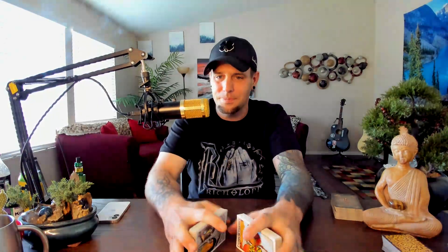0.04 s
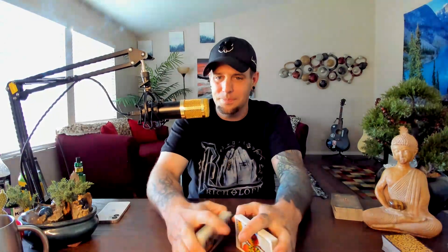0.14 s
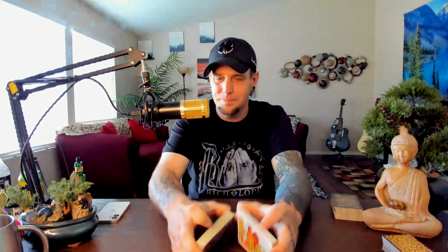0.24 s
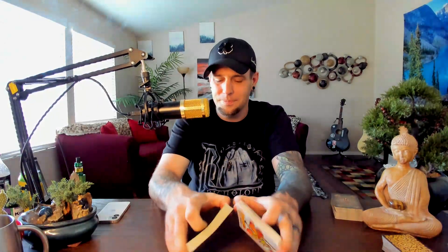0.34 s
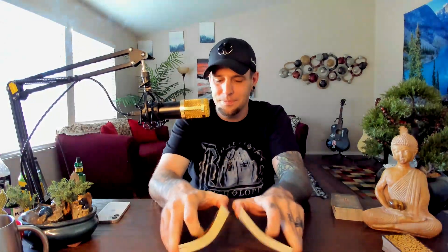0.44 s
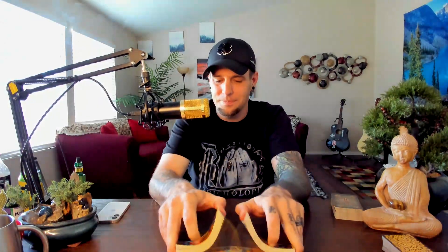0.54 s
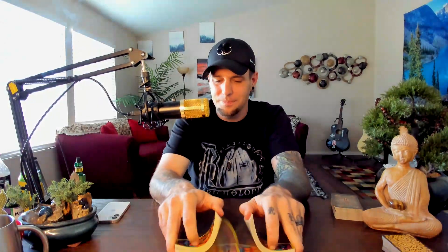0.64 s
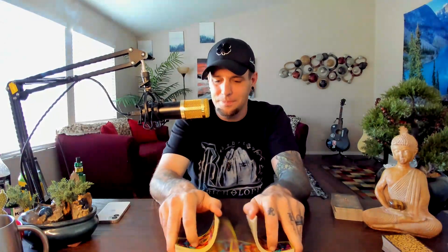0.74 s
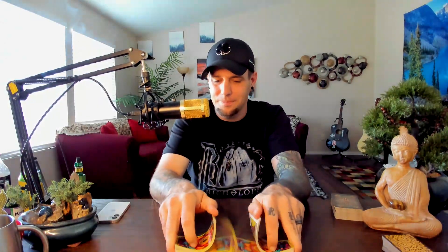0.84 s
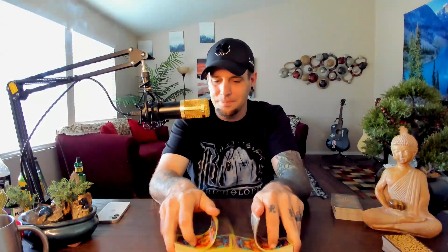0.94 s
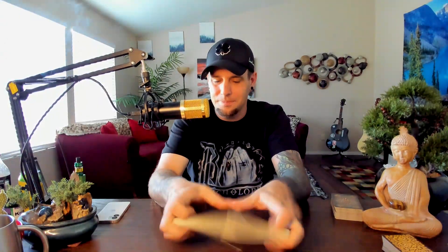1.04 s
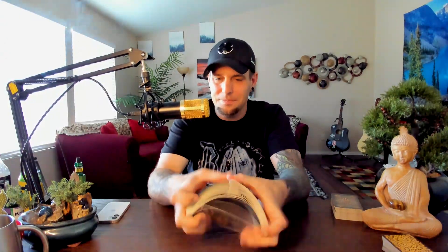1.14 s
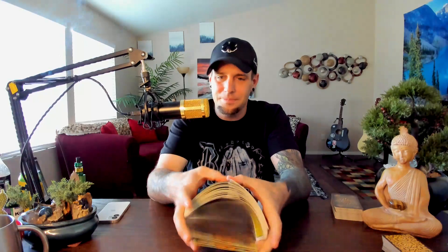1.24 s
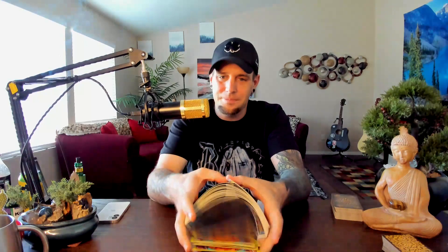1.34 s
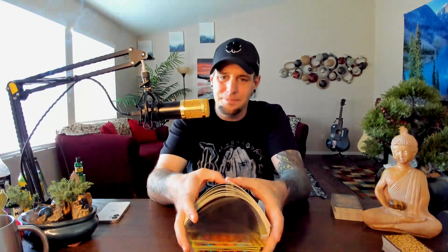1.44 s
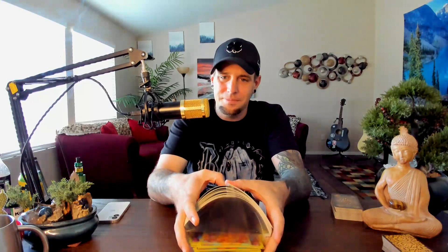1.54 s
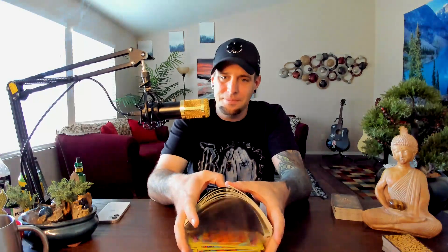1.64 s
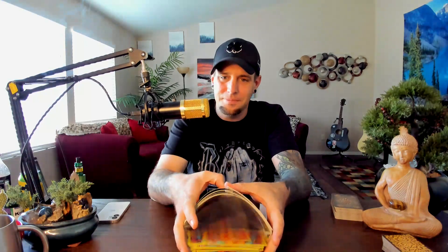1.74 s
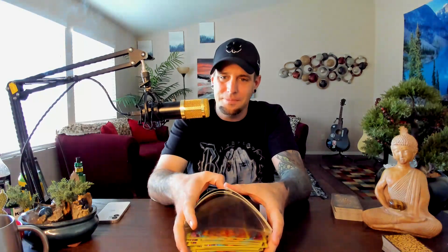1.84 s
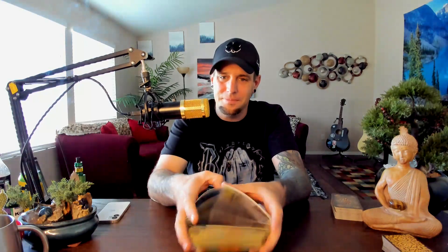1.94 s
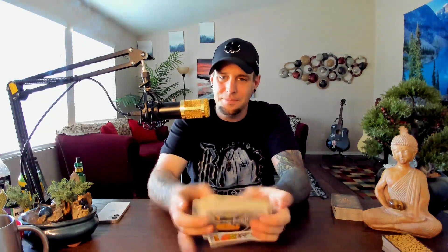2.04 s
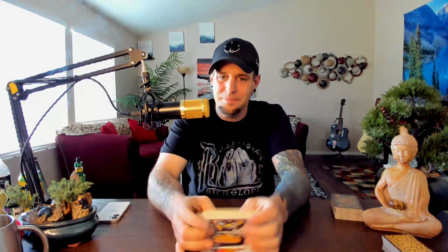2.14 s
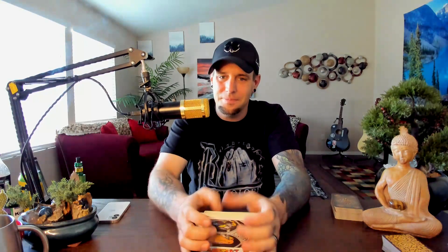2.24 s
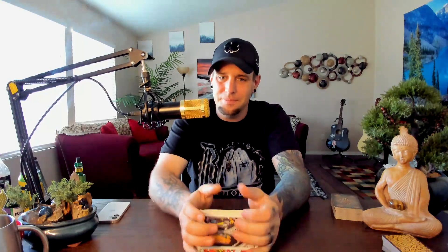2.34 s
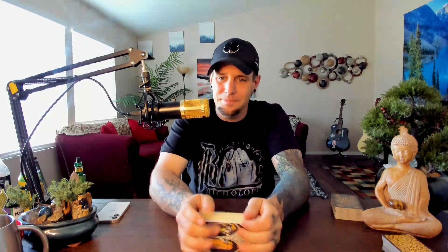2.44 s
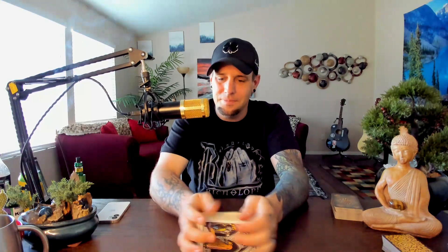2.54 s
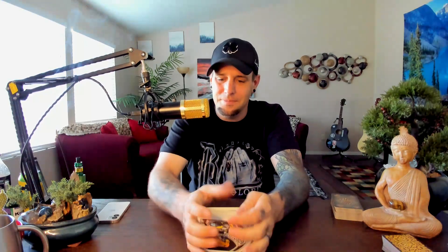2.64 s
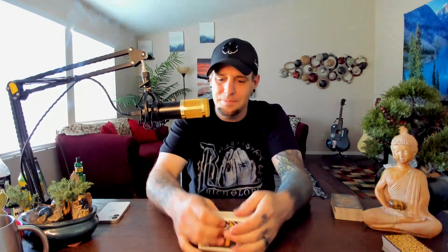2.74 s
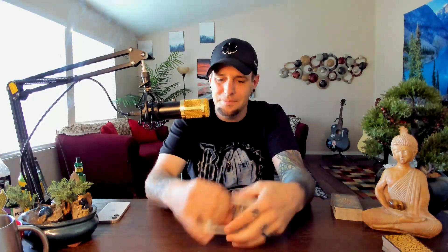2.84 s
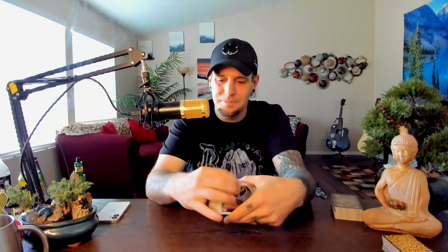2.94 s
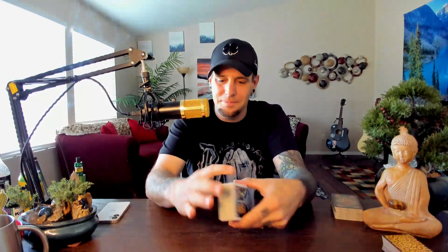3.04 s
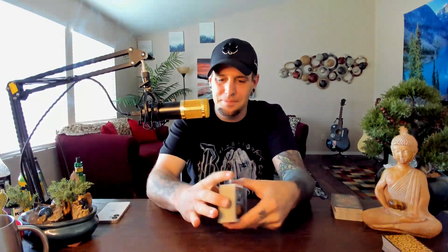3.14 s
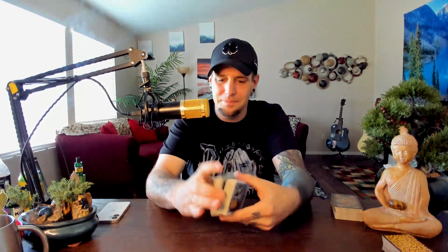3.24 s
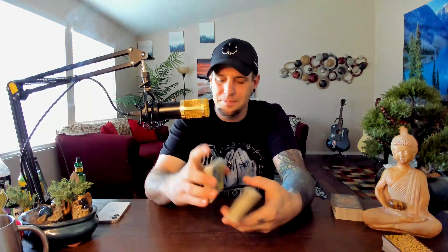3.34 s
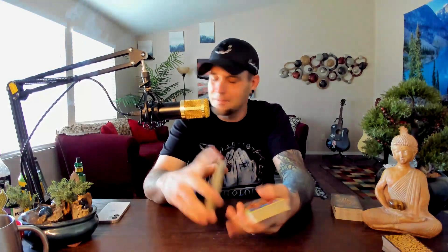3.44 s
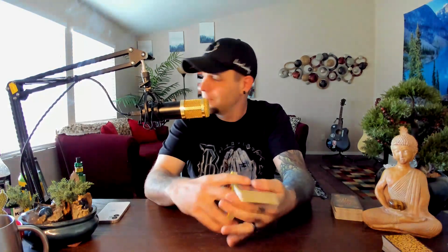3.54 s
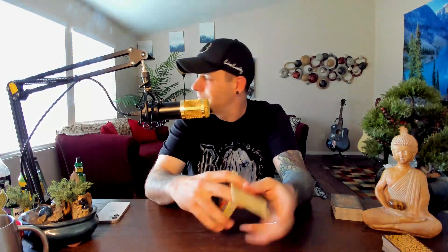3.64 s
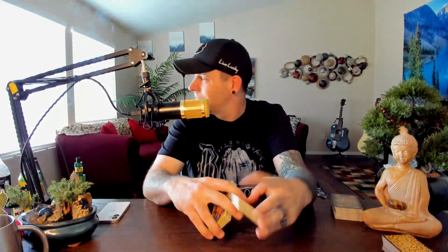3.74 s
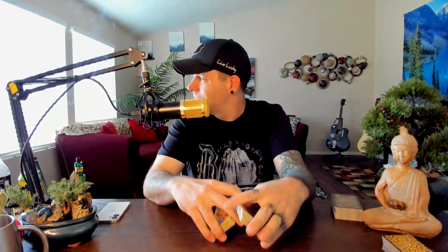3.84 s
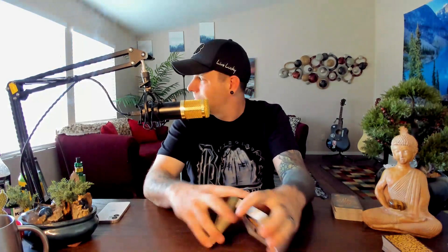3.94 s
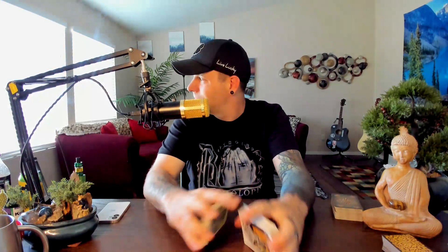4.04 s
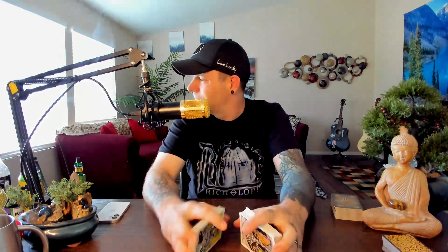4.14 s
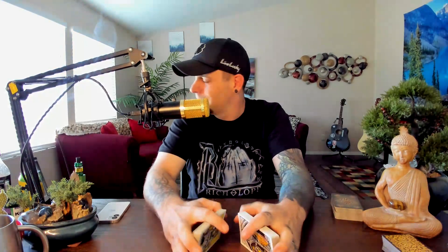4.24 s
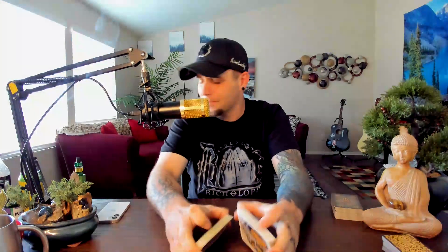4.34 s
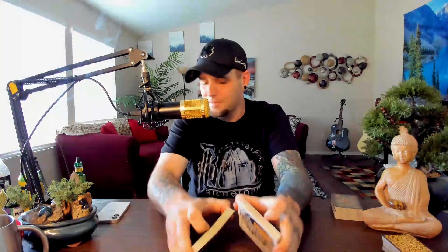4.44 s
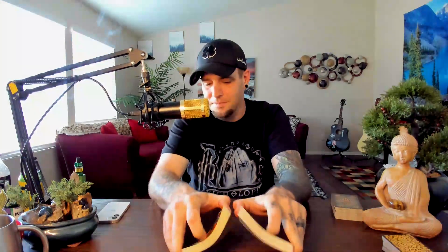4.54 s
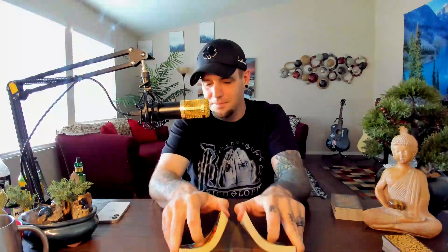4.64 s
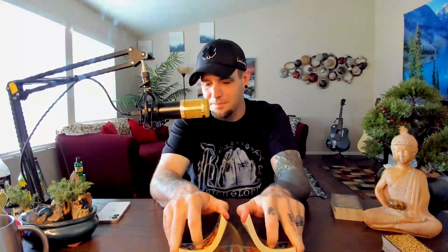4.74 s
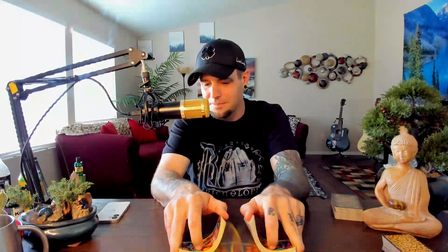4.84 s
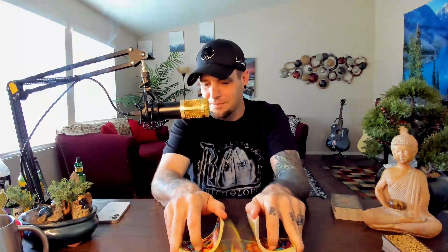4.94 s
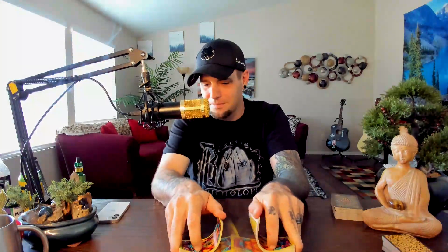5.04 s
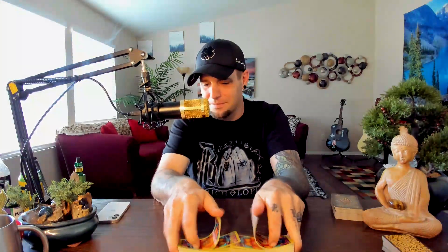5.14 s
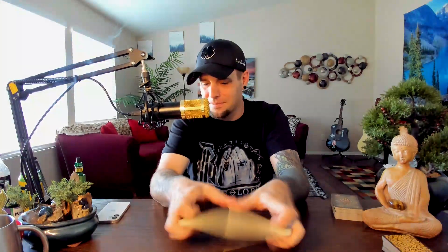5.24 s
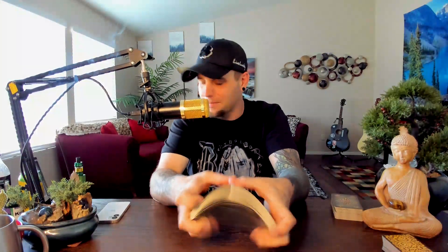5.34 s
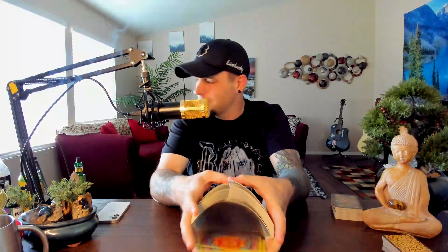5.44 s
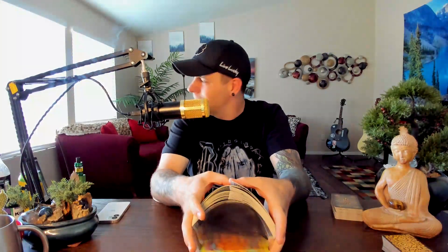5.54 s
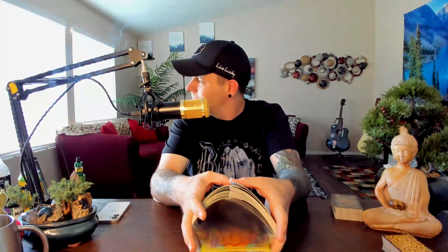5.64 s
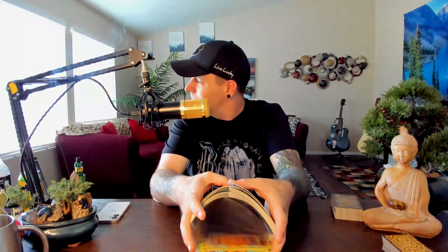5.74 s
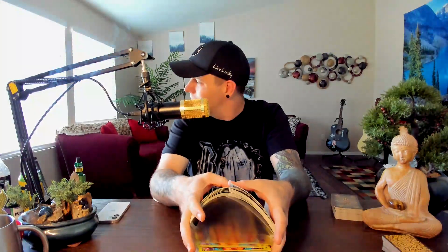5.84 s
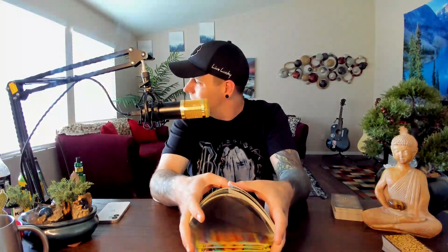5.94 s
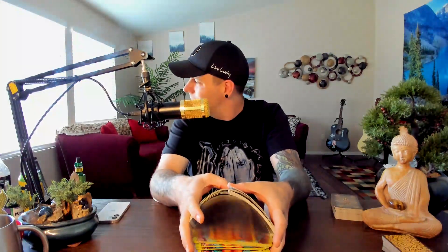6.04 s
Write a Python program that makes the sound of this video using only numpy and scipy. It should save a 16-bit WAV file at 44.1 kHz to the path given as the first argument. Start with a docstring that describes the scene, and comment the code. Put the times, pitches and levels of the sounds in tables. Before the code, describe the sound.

A deck of cards is squared with sharp taps and riffled twice on a wooden desk, crisp snaps fluttering fast over a low room hush.

```python
"""Crisp card snaps crowd into two fast riffles, with deck taps between them, over a low room hush.
Hands riffle and bridge a deck on a wooden desk in a living room, a microphone an arm's length away.
Each card or deck contact is a short noise puff ringing paper, desk and edge resonances.
Skin and card faces add grainy friction hiss, and a wrist makes one low bump.
Shaped noise tails make the desktop and the walls answer."""
import sys
import numpy as np
from scipy import signal
from scipy.fft import rfft, irfft, next_fast_len
from scipy.io import wavfile
from scipy.ndimage import uniform_filter1d

SR = 44100
rng = np.random.default_rng(int(sys.argv[2]) if len(sys.argv) > 2 else 0)


def master_out(mix):
    """Clip the mix to full scale and print it as 16-bit PCM to the path in sys.argv[1]."""
    frames = np.transpose(np.atleast_2d(mix))
    ceiling = np.clip(frames, -1, 1)
    pcm = np.round(ceiling * 32767).astype(np.int16)
    wavfile.write(sys.argv[1], SR, pcm)


N = 269230
LEAD = SR // 10  # samples of run-up, so a sound may start before time zero
TOP_HZ = 16000

# The level of the background hush. Each row: time in seconds, rms level in dB.
HUSH_LEVEL = [(0, -63), (2.9, -64), (3.2, -73), (3.45, -72), (3.6, -68.5), (4.1, -64), (4.3, -63.5),
              (6.2, -70)]
# The colour of the hush. Each row: frequency in Hz, relative level in dB per Hz.
HUSH_SPECTRUM = [(25, 0), (80, -6), (130, -5.5), (360, -7.5), (600, -4), (850, -8.5), (1000, 2), (1180, -5),
                 (2500, -12.5), (8000, -30.5), (16000, -48)]

# How long the room rings. Each row: frequency in Hz, time to fall by 60 dB in seconds.
ROOM_DECAY = [(150, 0.42), (400, 0.51), (1000, 0.69), (2800, 0.53), (7000, 0.41), (14000, 0.29)]
# The colour of the walls' answer. Each row: frequency in Hz, relative level in dB.
WALL_COLOUR = [(100, -3), (300, 5), (1000, 0), (4000, 0.5), (8000, -2.5), (15000, -4.5)]
# The microphone's treble loss. Each row: frequency in Hz, gain in dB.
MIC_RESPONSE = [(9000, -1.5), (12000, -8), (16000, -10)]

# Resonances of the wooden desk. Each row: frequency in Hz, width in Hz, relative level in dB.
DESK_MODES = [(147, 55, -8.5), (297, 60, -1.5), (497, 170, -2), (850, 240, -4.5), (1292, 170, 1.5)]
# The desk under the whole deck. Each row: frequency in Hz, width in Hz, relative level in dB.
UNDER_DECK_MODES = [(155, 35, -15), (320, 42, -12), (610, 610, -23)]
# A bent card flapping. Each row: frequency in Hz, width in Hz, relative level in dB.
CARD_MODES = [(1680, 330, -1.5), (2927, 700, 3.5), (5400, 2200, -9)]
# The squared deck. Each row: frequency in Hz, width in Hz, relative level in dB.
DECK_MODES = [(1735, 780, -7.5), (2647, 660, 0), (3457, 660, -4.5), (5530, 990, -7.5)]
# A card edge slipping off the skin. Each row: frequency in Hz, width in Hz, relative level in dB.
EDGE_MODES = [(4960, 16000, -3), (7450, 4400, 3)]
# Friction of soft sliding. Each row: frequency in Hz, relative level in dB per Hz.
SKIN_SPECTRUM = [(1500, -40.5), (3000, -1), (8000, -3), (11000, -11.5), (16000, -29.5)]
# Smooth card faces rubbing. Each row: frequency in Hz, relative level in dB per Hz.
FACE_SPECTRUM = [(1000, -27.5), (3000, 4.5), (8000, -6), (12000, 6), (16000, -10)]

# Fingers shifting on the deck. Each row: time in seconds, relative level in dB.
FINGER_TOUCHES = [(0.45, -45.5), (0.4764, -51), (0.499, -47.5), (3.279, -55.5), (3.5594, -62.5),
                  (3.651, -66.5), (3.704, -54.5), (4.4895, -55)]
# Cards and skin sliding softly. Each row: middle in seconds, length in seconds, peak rms level in dB.
SLIDE_STROKES = [(.485, 0.11, -70), (2.17, 0.036, -54), (2.3, 0.092, -68), (2.47, 0.053, -61),
                 (2.68, 0.53, -62.5), (3.305, .07, -76), (3.435, 0.087, -76), (3.6, 0.11, -77),
                 (3.72, .07, -75), (3.83, 0.1, -73.5), (3.995, 0.071, -70.5), (4.5, 0.22, -74.5),
                 (4.65, 0.034, -72)]
# Card edges landing on the desk as a deck; the row at 4.236 is the wall's slap after the tap at 4.204.
# Each row: peak in seconds, flap level in dB, hollow knock level in dB, desk thump over the hollow
# in dB, edge tick level in dB, rise in seconds, fall in seconds, hollow pitch in Hz,
# strongest paper pitch in Hz.
DECK_TAPS = [(-0.04, -6.5, -13, -9, -15.5, 0.00087, 0.011, 810, 3000),
             (.015, -20.5, -26.5, 2, -34, 0.0023, .005, 1240, 3100),
             (0.075, -21, -19.5, -2.5, -30, 0.0014, 0.0063, 1250, 3930),
             (0.0898, -14, -17.5, -0.5, -27, 0.0011, 0.005, 1665, 2470),
             (2.1598, -49.5, -38, -3, -60.5, .0008, 0.002, 1010, 2200),
             (2.174, -44, -29, -5.5, -48.5, .0008, 0.0045, 1240, 2300),
             (2.1828, -41.5, -30.5, -4.5, -50, .0008, 0.0012, 1190, 3000),
             (2.1929, -28, -28.5, -1.5, -46, 0.00043, 0.0044, 1290, 3700),
             (2.2033, -20.5, -21, 0.5, -39, .0003, 0.0015, 1270, 3700),
             (2.2055, -17.5, -18.5, 5, -34, 0.0021, 0.0066, 1260, 3800),
             (2.2165, -10, -27.5, 0, -22.5, 0.005, 0.0051, 1260, 2560),
             (2.495, -26, -34, 6, -40.5, 0.0012, 0.0029, 1600, 3520),
             (2.5049, -27.5, -33, -2, -47.5, 0.00074, 0.011, 1180, 4360),
             (2.516, -19.5, -31, 4, -39.5, 0.00072, 0.0078, 1550, 2920),
             (2.5236, -15, -24, 4.5, -39, 0.0019, 0.0034, 1650, 4350),
             (2.6149, -27.5, -32, 0, -50.5, 0.0028, 0.0073, 1170, 3370),
             (2.62, -18, -37, -9, -39, 0.00039, 0.0023, 1260, 3440),
             (2.636, -20.5, -20.5, -1.5, -38, 0.0028, 0.003, 1220, 4300),
             (2.738, -19.5, -24.5, 3, -40.5, 0.0034, 0.005, 1550, 4050),
             (2.7489, -17, -27, 8, -28.5, 0.0015, 0.0085, 1290, 3350),
             (2.778, -30, -32.5, -3, -44.5, 0.00055, 0.0017, 1640, 4400),
             (4.1167, -56, -31, 11, -69, 0.001, 0.0018, 935, 4400),
             (4.165, -57.5, -47, 3.5, -73.5, 0.00087, .0043, 507, 2460),
             (4.1924, -31, -32, 10, -53.5, 0.0007, 0.006, 1220, 2200),
             (4.2, -17, -19, 1.5, -46, 0.00091, 0.0029, 1138, 2540),
             (4.2042, -8, -19, 7.5, -26.5, 0.00088, 0.005, 1128, 3773),
             (4.236, -26, -33, 0, -36, .0004, 0.0022, 1790, 3800),
             (5.309, -31, -25, -7, -44.5, 0.0016, 0.0036, 700, 2200)]
# Cards dropping flat on the desk. Each row: time in seconds, relative level in dB.
CARD_LANDINGS = [(0.533, -30), (0.541, -32), (0.555, -32), (0.586, -29), (0.613, -26.5), (0.637, -34),
                 (0.681, -25), (0.697, -28), (0.723, -28.5), (0.741, -36.5), (0.751, -36), (0.77, -32.5),
                 (0.786, -36), (0.803, -36.5), (0.817, -34), (0.834, -26.5), (0.845, -35.5), (0.861, -38.5),
                 (0.873, -36.5), (0.884, -28), (0.898, -30.5), (0.91, -35.5), (0.928, -37.5), (0.938, -29),
                 (0.959, -30.5), (0.986, -33.5), (1.002, -27.5), (1.016, -29), (1.034, -37), (1.046, -32),
                 (1.082, -31), (1.101, -47), (1.291, -38), (1.304, -30), (1.776, -39), (1.813, -37),
                 (2.011, -40), (4.683, -34.5), (4.694, -31), (4.726, -39), (4.743, -34), (4.75, -34),
                 (4.768, -33), (4.787, -32), (4.82, -38.5), (4.837, -35), (4.853, -31), (4.904, -32),
                 (4.916, -33), (4.935, -40.5), (4.962, -29.5), (4.988, -30), (5.001, -34), (5.046, -35),
                 (5.067, -35.5), (5.076, -30), (5.127, -37), (5.136, -28), (5.164, -29), (5.184, -39.5),
                 (5.21, -34.5), (5.221, -33.5), (5.27, -44), (5.286, -31), (5.309, -32.5), (5.323, -45),
                 (5.496, -36), (5.804, -34.5), (5.878, -41.5)]
# The cascade of small slaps, one list a shuffle. Each row: time in seconds, relative level in dB.
FLUTTER_LEVELS = [
    [(.525, -48.5), (.62, -57), (.73, -42), (1.05, -33), (1.2, -53.5), (1.32, -43.5), (1.4, -48),
     (1.8, -45.5), (2.13, -54.5)],
    [(4.66, -51.5), (4.75, -59), (4.97, -35), (5.1, -39.5), (5.22, -37), (5.3, -37.5), (5.42, -62),
     (5.55, -49), (6.11, -48)],
]
# The loud cards snapping free. Each row: time in seconds, relative level in dB,
# brightness in dB as edge tick over flap.
CARD_SNAPS = [(0.5263, -40.5, -9), (0.5342, -27.5, -4), (0.5408, -26, -11), (0.5492, -26.5, -11),
              (0.555, -32.5, -14), (0.5767, -22.5, 0.5), (0.6104, -26.5, -2), (0.6214, -31.5, 4),
              (0.6398, -24, -2), (0.6566, -15.5, -4.5), (0.667, -26.5, 0), (0.678, -26.5, -7.5),
              (0.6974, -23.5, -4.5), (0.713, -23, -2.5), (0.731, -16.5, 2.5), (0.744, -19, 2.5),
              (0.7516, -24, -2.5), (0.7798, -19, 5.5), (0.7946, -22.5, -1.5), (0.8139, -23.5, -3.5),
              (0.8389, -21.5, -1), (0.844, -31.5, -3), (0.8542, -16.5, 1), (0.864, -21, -2.5),
              (0.8705, -27.5, -6), (0.8862, -23, -1), (0.898, -19.5, -2.5), (0.9114, -21.5, -4),
              (0.9247, -16.5, 4.5), (0.9295, -13, 10), (0.9403, -16.5, 7), (0.9479, -23, 1),
              (0.968, -23.5, 8.5), (0.9866, -25, 0.5), (1.0177, -24.5, 1), (1.0221, -20, -0.5),
              (1.0327, -18.5, 9.5), (1.0506, -19, 6), (1.0678, -22, 1), (1.1295, -30, -3),
              (1.2115, -31, 5.5), (1.2534, -20.5, 1.5), (1.2763, -24.5, 3), (1.291, -17, -6.5),
              (1.3, -21, -8), (1.3057, -20, 6), (1.3338, -21.5, 10.5), (1.3467, -31.5, 1),
              (1.3575, -39.5, 6), (1.4018, -36, -5), (1.4136, -32.5, 3), (1.4678, -28.5, -1),
              (1.5415, -24.5, 17.5), (1.583, -28, 10), (1.6275, -31, 1), (1.6572, -33.5, 8),
              (1.7381, -36.5, -4), (1.7655, -30.5, 10.5), (1.7779, -28, 8), (1.7904, -26, -16),
              (1.8101, -27.5, -0.5), (1.8304, -31.5, -4), (1.8396, -30.5, 7.5), (1.8667, -30, 4.5),
              (1.8961, -34.5, 9), (1.9239, -20.5, 4), (2.0084, -31.5, -6.5), (2.0135, -22.5, 4),
              (2.0201, -25.5, 4), (2.0491, -33, 4.5), (2.0557, -32.5, 2), (4.6775, -21, -30),
              (4.6908, -34.5, 23), (4.7062, -30.5, -4.5), (4.718, -33.5, -1), (4.7295, -31, -2.5),
              (4.7407, -25.5, -15.5), (4.7602, -24, -2.5), (4.775, -30.5, 10), (4.7883, -30, 0),
              (4.8065, -30, -3.5), (4.8182, -27.5, 3.5), (4.8374, -31, 2.5), (4.8442, -26.5, 3),
              (4.8577, -27, 4), (4.8751, -25, -11), (4.8811, -19, 13), (4.8877, -23, 0),
              (4.907, -29.5, -8.5), (4.9144, -19, -2), (4.9243, -18.5, 2), (4.9331, -20.5, 2.5),
              (4.9438, -16, 2.5), (4.9671, -18.5, 5), (4.973, -16, 5), (4.9796, -16.5, 8), (4.989, -22, -3),
              (4.9991, -21.5, -2.5), (5.0078, -16.5, 10), (5.0157, -16.5, 5.5), (5.026, -25.5, -6.5),
              (5.0425, -15.5, 0), (5.0481, -19.5, 8.5), (5.057, -28.5, 2.5), (5.084, -23, 2.5),
              (5.1027, -25.5, -4), (5.1382, -14.5, 4), (5.146, -25.5, -2.5), (5.1685, -16, 5.5),
              (5.1778, -21, 1), (5.196, -21.5, -4), (5.2104, -23.5, -2.5), (5.2229, -18, 4),
              (5.2499, -22, 2.5), (5.2707, -24.5, -6), (5.292, -23, 7), (5.4503, -28, 15),
              (5.4671, -34, 13), (5.4851, -31, 8), (5.4977, -17.5, 8.5), (5.5176, -36.5, -5),
              (5.5511, -33, 12), (5.5886, -34, 20), (5.5924, -27, 21), (5.617, -22.5, -9.5),
              (5.6183, -28, 0), (5.644, -31, 14.5), (5.6487, -34.5, 10.5), (5.6889, -34, 19),
              (5.724, -32, 2.5), (5.733, -34, 12), (5.7586, -22.5, 8), (5.7831, -29, 6.5),
              (5.792, -33.5, 9.5), (5.806, -27.5, 2.5), (5.8218, -33, 10), (5.8499, -31, -6),
              (5.8785, -29.5, 4), (5.8896, -23.5, 13), (5.9202, -23, 2), (5.928, -32, -6.5),
              (5.9565, -31, -0.5), (5.9828, -22.5, -2), (5.993, -29, -3.5), (6.048, -29.5, -2),
              (6.0871, -28, 8)]
# The two shuffles. Each row: end of the riffle in seconds, start of the last cards settling in seconds.
SHUFFLE_TIMES = [(1.11, 1.8), (5.33, 6.2)]

TOUCH_KNOCK_DB, TOUCH_TICK_DB = -4.5, -6  # over the flap
BUMP_S, BUMP_LENGTH_S, BUMP_DB, BUMP_HZ = 3.49, 0.076, -68, 128  # a wrist settles on the desk

# Pairs hold one value for the riffle and one for the bridge.
FLUTTER_BRIGHT_DB = (2.5, 4)  # edge over flap, before chance variation
SNAP_KNOCK_DB = (-11.5, -17.5)  # desk knock against flap, before chance variation
SNAP_RISE_S, SNAP_FALL_S = 0.0003, (0.002, 0.0016)
SNAP_PUSH = (3, 4.3)  # sharpness of the contact
CARD_DETUNE = (0.035, 0.1)  # spread of pitch from card to card, as a fraction


def amp(db):
    """Decibels to linear gain."""
    return 10 ** (np.asarray(db) / 20)


def unit(x):
    """Scale a sound to an rms of 1."""
    return x / np.sqrt(np.mean(x ** 2) + 1e-20)


def along(points, hz):
    """Read (Hz, value) points on a log frequency axis."""
    f, v = np.transpose(points)
    return np.interp(np.log(hz + 1), np.log(f + 1), v)


def curve(rows, s):
    """Read a level in dB at times s, down at -120 dB outside the table."""
    times, levels = np.transpose(rows)
    return np.interp(s, times, levels, left=-120, right=-120)


def filtered(x, response):
    """Shape x by a complex response of frequency."""
    n = x.shape[-1]
    m = next_fast_len(n + 2048)
    return irfft(rfft(x, m) * response(np.fft.rfftfreq(m, 1 / SR)), m)[..., :n]


def resonances(modes):
    """The causal response of (Hz, width Hz, dB) modes, summed with alternating sign."""
    def response(f):
        total = 0
        for k, (centre, width, db) in enumerate(modes):
            damping = 1j * f * width
            total = total + (-1) ** k * amp(db) * damping / (centre * centre - f * f + damping)
        return total
    return response


def timed(rows, rise, fall):
    """Give all rows the same rise and fall time."""
    return np.column_stack([rows, np.tile([rise, fall], (len(rows), 1))])


def by_phase(s, riffle, bridge):
    """Pick the bridge value from riffle end to 0.2 s past first settling, else the riffle value."""
    bridging = sum((s > end) & (s < settle + 0.2) for end, settle in SHUFFLE_TIMES)
    return np.where(bridging, bridge, riffle)


def swells(rows):
    """Sum a bell-shaped gain for each (middle s, length s, dB) row."""
    s = np.arange(-LEAD, N) / SR
    return sum(amp(db) * np.exp(-(2 * (s - middle) / length) ** 4) for middle, length, db in rows)


def hiss(spectrum):
    """Friction as noise of rms 1 whose level jumps from grain to grain."""
    n = N + LEAD
    grain_db = 10 * uniform_filter1d(rng.standard_normal(n // 64 + 1), size=4)
    grain = amp(grain_db).repeat(64)[:n]
    return unit(filtered(grain * rng.standard_normal(n), lambda f: amp(along(spectrum, f))))


def background():
    """A low hush with a band near 1 kHz, made of filtered noise on a drifting level."""
    noise = filtered(rng.standard_normal(N), lambda f: amp(along(HUSH_SPECTRUM, f)))
    return amp(curve(HUSH_LEVEL, np.arange(N) / SR)) * unit(noise)


def room(x, size):
    """The walls' answer builds up, the far wall slaps back, then each frequency dies at its own speed."""
    frames = dict(fs=SR, nperseg=384, noverlap=320)
    hz, t, z = signal.stft(x, **frames)
    t = t[t < 1]
    far_wall = 2.0 * np.exp(-((t - 0.033) / 0.0024) ** 2)
    build = 1.2 + 1 - np.exp(-(t / 0.023) ** 2) + far_wall
    fall_db = along(WALL_COLOUR, hz)[:, None] - 60 * t / along(ROOM_DECAY, hz)[:, None]
    decay = (amp(fall_db) * build) ** 2
    # the walls hear the cards from all sides, which evens out the colour over size bands
    power = uniform_filter1d(np.abs(z) ** 2, size=size, axis=0)
    power = signal.fftconvolve(power, decay / decay.sum(axis=1).mean(), axes=1)[:, :z.shape[1]]
    noise = signal.stft(rng.standard_normal(len(x)), **frames)[2]
    noise = noise / np.sqrt(np.mean(np.abs(noise) ** 2))
    return signal.istft(np.sqrt(np.abs(power)) * noise, **frames)[1][:len(x)]


def desktop(x, size=1024):
    """The desk top throws each sound back after 3 ms, with a short noise tail drawn anew for each block."""
    blocks = np.pad(x, (0, -len(x) % size)).reshape(-1, size)
    t = np.arange(3 * size) / SR
    tail = amp(-60 * t / 0.065) * (1 - np.exp(-t / 0.00094))
    bounce = 1.2 * np.exp(-((t - 0.003) / 0.0006) ** 2)
    shape = tail + bounce
    answers = shape * rng.standard_normal((len(blocks), len(t))) / np.linalg.norm(shape)
    echo = signal.fftconvolve(blocks, answers, axes=1)
    where = size * np.arange(len(blocks))[:, None] + np.arange(echo.shape[1])
    return np.bincount(where.ravel(), echo.ravel())[:len(x)]


def level_peaks(x):
    """Scale each slap so that its loudest 32-sample rms is 1."""
    power = uniform_filter1d(x * x, size=32, axis=1)
    return x / np.sqrt(power.max(axis=1, keepdims=True))


def slaps(rows, paper, body, scatter_db=4, detune=0.12, push=3.7, size=2048):
    """Each row is a puff of noise that shakes the paper, what it lands on and its edge."""
    s, flap_db, knock_db, tick_db, rise, fall = np.transpose(rows)[:, :, None]
    early = 384  # samples before the peak
    t = (np.arange(size) - early) / SR
    swell = np.exp(np.where(t < 0, t / np.abs(rise), -t / np.abs(fall)))
    puff = swell * rng.standard_normal((3, len(rows), size))
    # the instant of contact is one sharp push
    puff[:, :, early] += push * np.array([[1], [0.8], [1.1]])
    # every card is held differently, so its modes change in pitch and strength
    bend = rng.standard_normal((len(rows), len(paper), 2, 1))
    modes = []
    for k, (hz, width, db) in enumerate(paper):
        modes.append((hz * (1 + detune * bend[:, k, 0]), width, db + scatter_db * bend[:, k, 1]))
    flap = filtered(puff[0], lambda f: resonances(modes)(f) * resonances([(3000, 6000, 0)])(f))
    knock = filtered(puff[1], lambda f: resonances(body)(f) * resonances([(600, 3000, 0)])(f) ** 2)
    tick = filtered(puff[2] * swell ** 0.5,
                    lambda f: resonances(EDGE_MODES)(f) * resonances([(8000, 9000, 0)])(f))
    sound = amp(flap_db) * level_peaks(flap)
    sound += amp(knock_db) * level_peaks(knock)
    sound += amp(tick_db) * level_peaks(tick)
    where = np.round(s * SR).astype(int) + LEAD - early + np.arange(size)
    return np.bincount(where.ravel(), sound.ravel(), N + LEAD + size)[:N + LEAD]


def touches():
    """Faint shifts of the fingers shake the deck, over a soft sliding hiss and one low bump."""
    s, db = np.transpose(FINGER_TOUCHES)
    rows = np.column_stack([s, db, db + TOUCH_KNOCK_DB, db + TOUCH_TICK_DB])
    shifts = amp(-6.0) * slaps(timed(rows, 0.00041, 0.0076), DECK_MODES, DESK_MODES, size=3072)
    noise = rng.standard_normal(N + LEAD)
    low = unit(filtered(noise, lambda f: resonances([(BUMP_HZ, 100, 0)])(f) ** 2))
    bump = swells([(BUMP_S, BUMP_LENGTH_S, BUMP_DB)]) * low
    slide = swells(SLIDE_STROKES) * hiss(SKIN_SPECTRUM)
    return shifts + slide + bump


def taps():
    """The deck lands card after card, so each blow swells before it dies; air trapped under it rings."""
    s, flap_db, knock_db, thump_db, tick_db, rise, fall, hollow_hz, paper_hz = np.transpose(DECK_TAPS)
    rows = np.column_stack([s, flap_db, knock_db, tick_db, rise, fall])
    desk = [(hz, width, db + thump_db[:, None]) for hz, width, db in UNDER_DECK_MODES]
    hollow = [(hollow_hz[:, None], 120, 0)]
    paper = DECK_MODES + [(paper_hz[:, None], 350, 0.5)]
    return slaps(rows, paper, desk + hollow, scatter_db=3.5, detune=0.01, push=2.2, size=3072)


def landings():
    """A card dropping flat gives a dull desk knock with little paper in it."""
    s, db = np.transpose(CARD_LANDINGS)
    rows = np.column_stack([s, db - 4.5, db, db - 19.5])
    return amp(2) * slaps(timed(rows, 0.00044, 0.0011), CARD_MODES, DESK_MODES, push=5)


def flutter(count=1500):
    """Many weak cards slap at chance times and sizes, their faces rubbing as they fall."""
    def level(s):
        return np.maximum(*[curve(rows, s) for rows in FLUTTER_LEVELS])

    when, strength, knock, tick = rng.random((count, 4)).T
    s = (np.arange(count) + 0.9 * when) / count * N / SR
    db = level(s) + 14 * (strength - 0.6)
    knock_db = db - 4.5 + 8 * (knock - 0.5)
    tick_db = db + by_phase(s, *FLUTTER_BRIGHT_DB) + 8 * (tick - 0.5)
    rows = np.column_stack([s, db, knock_db, tick_db])[db > -100]
    small = slaps(timed(rows, 0.00018, 0.0021), CARD_MODES, DESK_MODES, detune=0.05, push=2.2)
    s = np.arange(-LEAD, N) / SR
    rub = amp(level(s) + by_phase(s, *FLUTTER_BRIGHT_DB) - 10) * hiss(FACE_SPECTRUM)
    return small + rub


def snaps():
    """A loud card springs free: a sharp push, its puff gone in a few thousandths of a second."""
    s, db, bright_db = np.transpose(CARD_SNAPS)
    # share the power between flap and edge tick
    flap_db = db - 10 * np.log10(1 + amp(2 * bright_db))
    knock_db = flap_db + by_phase(s, *SNAP_KNOCK_DB) + 3 * rng.standard_normal(len(s))
    tick_db = flap_db + bright_db + 2.0
    rise = np.full(len(s), SNAP_RISE_S)
    rows = np.column_stack([s, flap_db + 1.0, knock_db, tick_db, rise, by_phase(s, *SNAP_FALL_S)])
    return slaps(rows, CARD_MODES, DESK_MODES, push=by_phase(s, *SNAP_PUSH),
                 detune=by_phase(s, *CARD_DETUNE)[:, None])


def scene():
    """Mix the close sounds with the answers of room and desktop, over the hush."""
    cards = snaps() + landings() + flutter()
    deck = taps()
    near = cards + deck + touches()
    # the faint fingers feed the desktop echo only
    walls = room(amp(-8) * cards, size=5) + room(amp(-8.5) * deck, size=2)
    wet = walls + amp(-9.0) * desktop(near)
    return ((near + wet)[LEAD:] + background())[None]


def record(dry):
    """The microphone dulls the treble, rounds off the loudest blows and cuts rumble and the band above."""
    x = filtered(dry, lambda hz: amp(along(MIC_RESPONSE, hz)))
    x = x / (1 + np.abs(x / 0.36) ** 4) ** (1 / 4)
    return filtered(x, lambda hz: (hz / np.hypot(hz, 55)) ** 2 * (hz < TOP_HZ))


dry = scene()
out = record(dry)
master_out(out)
```